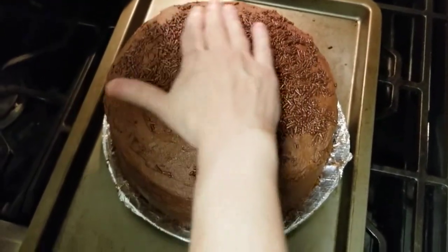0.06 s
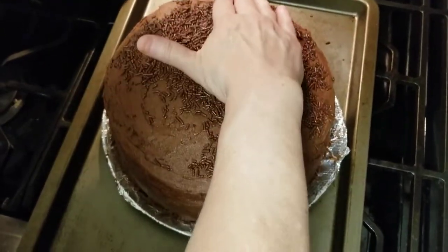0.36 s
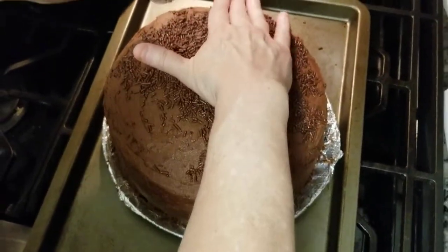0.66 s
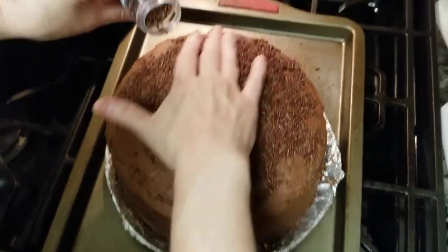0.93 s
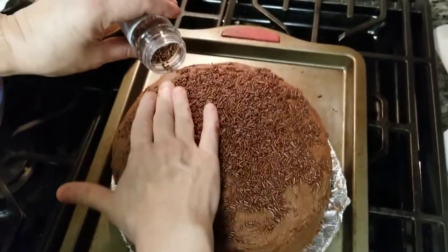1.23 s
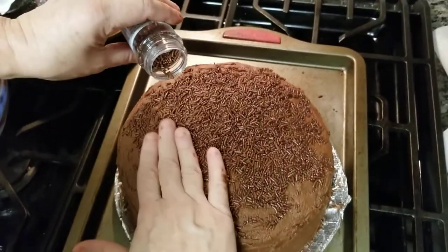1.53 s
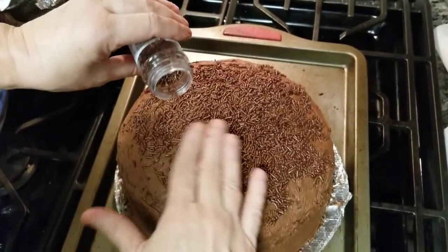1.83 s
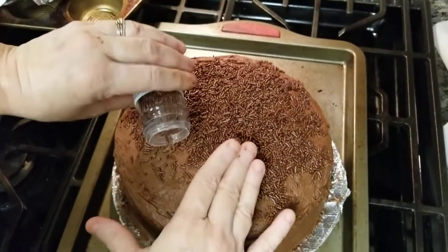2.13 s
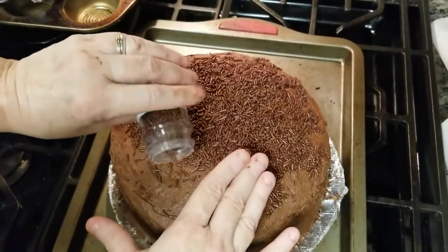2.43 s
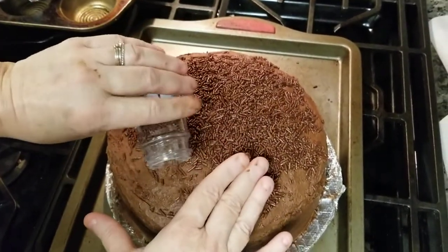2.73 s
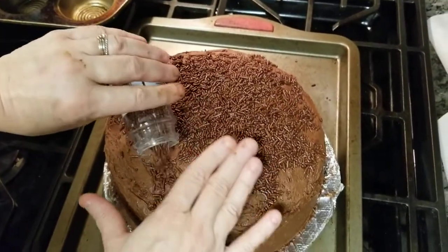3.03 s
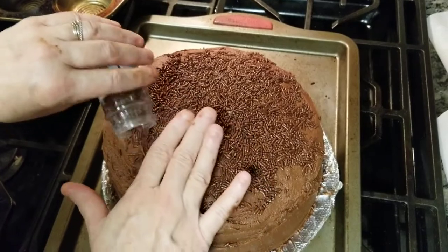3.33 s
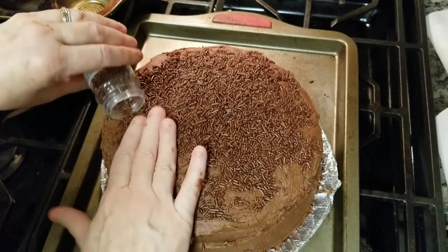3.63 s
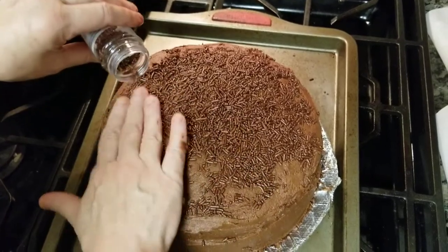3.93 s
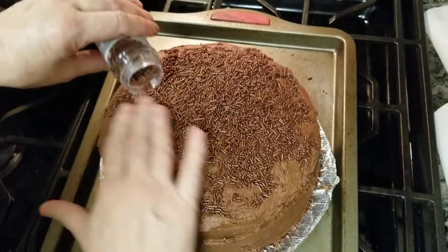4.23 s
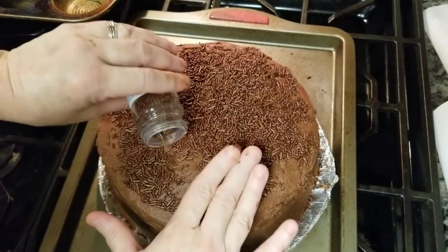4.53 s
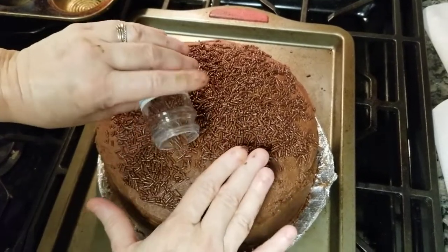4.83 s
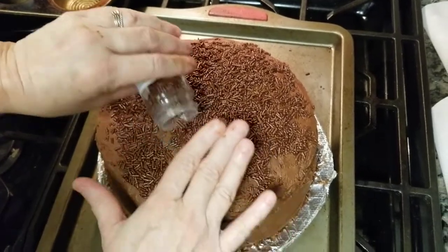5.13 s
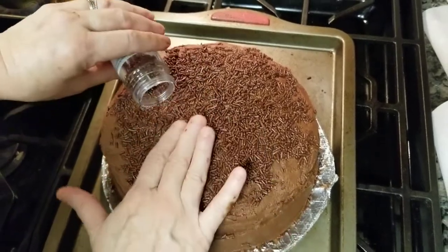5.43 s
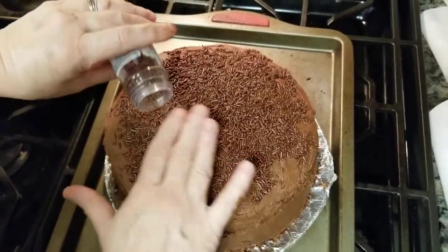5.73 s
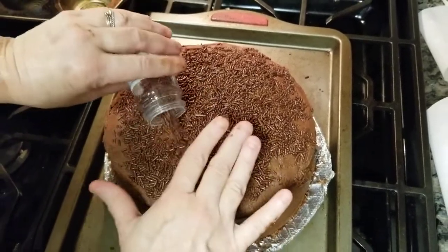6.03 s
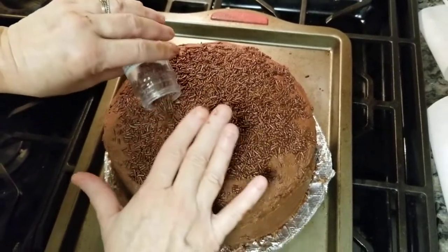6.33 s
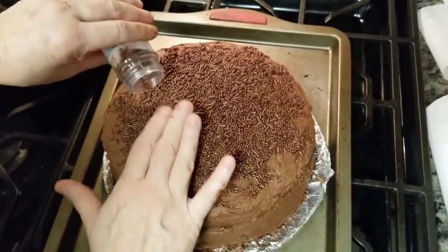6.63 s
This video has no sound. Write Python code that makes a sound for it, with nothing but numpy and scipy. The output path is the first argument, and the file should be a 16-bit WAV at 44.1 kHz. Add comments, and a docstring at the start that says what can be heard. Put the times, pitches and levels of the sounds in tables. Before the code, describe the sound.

Sprinkles are shaken from a small plastic jar onto a cake, heard close up in a small kitchen with a faint, low appliance hum throughout. A sharp tick comes at about 0.4 seconds, followed by light clicks and three gentle shakes around 1 second, while a hand faintly rubs the grains. After a lull, four short, bright rattles come between 2.1 and 3 seconds. Grains then trickle out in a fine, high patter, with clumps ticking irregularly on the jar and baking tray until about 4 seconds. Three more shakes follow from 4.5 to 4.9 seconds. The hand pats the soft cake with dull thuds, clearest near 5.3 and 5.6 seconds. The strongest shake comes at 5.8 seconds with a brief, thin scrape. Four more follow about a quarter second apart, with trickling grains and two soft pats near 6.5 and 6.7 seconds.

```python
"""In a small kitchen where an appliance hums, a frosted cake stands on a baking tray on a stove.
Chocolate sprinkles are shaken onto it from a small plastic jar, while a hand spreads and pats them.
Each shake throws the grains along the jar, and their many collisions merge into a bright swell.
They trickle out, and clumps tick on jar and tray, exciting the resonances of both.
Grains rolling under the palm sound its hollow; a pat on the soft cake gives a dull thud."""
import sys
import numpy as np
from scipy import signal
from scipy.fft import rfft, irfft
from scipy.io import wavfile
from scipy.ndimage import uniform_filter1d

SR = 44100
rng = np.random.default_rng(int(sys.argv[2]) if len(sys.argv) > 2 else 0)


def file_out(sig):
    """Save sig as 16-bit WAV at sys.argv[1]."""
    # one column per channel
    cols = np.atleast_2d(sig).T
    # limit, then scale
    lim = np.clip(cols, -1, 1)
    pcm = np.round(lim * 32767).astype(np.int16)
    wavfile.write(sys.argv[1], SR, pcm)


N = 298723
TIME = np.arange(N) / SR

# All table levels are relative; each source adds its own gain.
# motor tones of the appliance: (frequency [Hz], level [dB], waver [0-1])
MOTOR_TONES = [(117.8, -60.5, 0.22), (187.7, -63, 0.37), (211.8, -64, 0.77), (234.3, -56.5, 0.43),
               (372.3, -73, 0.7), (396, -74.5, 0.49), (1181, -78, 0.2)]
# the appliance swells and sinks, and its deepest tone fades: (time [s], level [dB])
APPLIANCE_SWELL = [(0, -3.5), (.6, 2), (1.4, 2), (3.2, -0.5), (5.3, 0), (6.77, -0.5)]
DRONE_FADE = [(0, -53.5), (1.15, -50.5), (3.9, -60), (5.3, -71), (6.77, -66)]
# spectrum of the kitchen air: (frequency [Hz], level [dB])
AIR_SPECTRUM = [(20, -38), (45, -6), (95, 0.5), (165, -2.5), (225, 4), (290, -5.5), (420, -10), (650, -10),
                (1000, -21.5), (2000, -29), (3500, -64), (8000, -46), (15500, -43)]
# transfer from the cake to each ear: (frequency [Hz], gain [dB])
LEFT_RESPONSE = [(600, -5), (1100, -3.5), (1500, -1.5), (2000, -3), (2550, -2.5), (3200, 0.5), (4500, 3.5),
                 (7000, 4.5), (8300, 0.5), (10500, 0.5), (15500, -0.5)]
RIGHT_RESPONSE = [(600, -3.5), (1100, 2), (1500, 0.5), (2000, 4), (2550, 4), (3200, 0), (4500, 3.5),
                  (7000, 0.5), (8300, 1), (10500, 2.5), (15500, -5.5)]
# soft pats on the cake: (time [s], level [dB], frequency [Hz])
CAKE_PATS = [(3.62, -42.5, 85), (4.463, -46, 80), (5.348, -35, 120), (5.563, -32, 102), (6.495, -41, 111),
             (6.716, -32.5, 104)]
# strokes of the hand over the sprinkles: (start [s], length [s], level [dB])
HAND_STROKES = [(0.0, 0.11, -60), (0.4, 0.58, -60), (0.83, 0.091, -58.5), (1.17, 0.38, -60),
                (4.44, 0.41, -69), (4.9, 0.87, -56.5), (5.77, 0.98, -62.5)]
# modes of the hollow under the palm and of the jar: (frequency [Hz], T60 [s], level [dB])
PALM_RESONANCES = [(1430, 0.014, -4.5), (1916, 0.0071, 0.5), (2720, 0.0068, -8.5)]
JAR_RESONANCES = [(2140, 0.027, -11.5), (2450, 0.009, -3.5), (3480, 0.047, -10.5)]
# spectra of grains rubbing, falling and rattling, of jar wall and tray: (frequency [Hz], level [dB])
RUBBING_SPECTRUM = [(300, -21), (700, -8.5), (1100, -7), (1650, -7), (2000, 3.5), (2400, -2), (3100, -3),
                    (4500, -7.5), (8000, -3), (15000, -36)]
TRICKLE_SPECTRUM = [(500, -6), (1500, -32.5), (3000, -26.5), (5000, -9.5), (6200, -15.5), (7300, -6.5),
                    (9300, -10), (11500, 2), (12800, 4), (14000, 8), (15500, 0)]
RATTLE_SPECTRUM = [(300, -21.5), (1000, -25), (2200, -25.5), (3200, -15.5), (5000, -14), (6200, -13.5),
                   (7300, -4.5), (9000, -7), (11500, 3.5), (13000, 4.5), (14000, 5.5), (15500, 3)]
WALL_SPECTRUM = [(400, -16), (1000, -7), (1550, -3), (2050, 7.5), (2500, 4), (3000, 0.5), (3600, -1),
                 (5400, -4), (8000, 1), (15000, -6.5)]
TRAY_SPECTRUM = [(150, -14), (380, -9), (500, 5), (650, -1.5), (850, 0.5), (1200, -5), (1800, -3),
                 (4000, -26.5)]
# grains scraping along the jar: (time [s], level [dB])
SCRAPE_LEVELS = [(5.68, -82), (5.77, -61), (5.84, -48), (5.95, -51), (6.03, -60), (6.2, -77)]
# the jar is tipped and grains run out: (start [s], length [s], trickle [dB], rubbing [dB])
JAR_POURS = [(0.0, 0.15, -44.5, -49), (0.78, 0.25, -54.5, -51), (1.15, 0.073, -44.5, -54),
             (1.25, 0.11, -40, -49.5), (1.66, 0.06, -51.5, -66), (2.3, 0.074, -49, -50.5),
             (2.42, 0.29, -46.5, -68), (2.77, 0.094, -41.5, -54), (2.94, 0.39, -37.5, -48.5),
             (3.43, 0.079, -38, -50.5), (3.8, 0.077, -44, -46.5), (4.0, 0.022, -42.5, -50),
             (4.45, 0.019, -34, -47.5), (4.6, 0.2, -45.5, -58), (4.9, 0.12, -40.5, -47.5),
             (5.06, 0.06, -40.5, -50), (5.78, 0.3, -38, -50), (6.18, 0.31, -40, -51.5)]
# the jar is jiggled and small clumps drop: (start [s], end [s], level [dB])
JAR_JIGGLES = [(0.49, 0.98, -43.5), (2.4, 2.72, -47.5), (2.96, 3.3, -38.5), (3.94, 4.06, -38),
               (4.1, 4.28, -55), (5.0, 5.3, -51), (6.55, 6.71, -47.5)]
# the loudest clumps on jar or tray: (time [s], rattle [dB], jar wall [dB], tray [dB], length [s])
CLUMP_HITS = [(0.385, -23.5, -34, -46, 0.0084), (0.424, -36, -51, -57, 0.0093),
              (0.4585, -36, -45, -72, 0.017), (0.5675, -46, -65, -78, 0.012),
              (0.678, -31.5, -47.5, -74, 0.0061), (1.506, -40.5, -55, -58, 0.024),
              (1.881, -37.5, -72, -72, 0.0044), (2.1217, -21.5, -28, -41, 0.01),
              (2.2368, -28.5, -36, -50, .01), (2.298, -38, -45, -60, 0.018),
              (2.564, -25.5, -55, -69, 0.014), (2.7743, -27.5, -37.5, -47, 0.01),
              (2.875, -32, -44.5, -69, 0.014), (2.9026, -27.5, -39.5, -44.5, 0.011),
              (3.034, -32, -36, -46.5, .012), (3.1825, -31.5, -42, -64, 0.0055),
              (3.3338, -24.5, -40.5, -42.5, 0.009), (3.3685, -44, -39, -47, 0.0065),
              (3.3974, -28, -35, -44.5, 0.011), (3.4327, -42, -37, -65, 0.0067),
              (3.4801, -27, -44, -55, 0.0084), (3.513, -37.5, -42.5, -53, 0.013),
              (3.568, -37, -43.5, -53, 0.009), (3.5897, -48, -39.5, -68, 0.0079),
              (3.6147, -32, -43, -57, 0.016), (3.6727, -34, -42, -56, 0.014),
              (3.7394, -37.5, -48.5, -55, 0.016), (3.7866, -38, -54, -61, 0.024),
              (3.8602, -28, -35.5, -72, 0.0073), (3.913, -55, -40, -72, 0.0041),
              (3.9251, -31, -45, -65, 0.019), (4.458, -26, -41.5, -52, .009), (4.608, -33, -48, -67, 0.01),
              (4.8015, -39, -43, -69, 0.0093), (4.826, -26.5, -34.5, -49.5, 0.017),
              (5.3478, -28.5, -45, -57, 0.011), (5.4215, -28, -35.5, -76, .0077),
              (5.7594, -22.5, -29, -66, 0.0017), (5.7866, -30, -36, -51, 0.0017),
              (5.829, -46, -30.5, -68, 0.0052), (6.3605, -42, -44, -53, 0.0068)]
# the load sliding along the jar:
# (crest time [s], rattle [dB], jar wall [dB], swell time [s], left minus right [dB])
JAR_SHAKES = [(0.821, -29, -37, 0.0068, -1), (1.006, -31.5, -40.5, 0.0065, 0),
              (1.17, -33.5, -42, 0.0066, 0), (2.094, -18, -46, 0.003, 1), (2.339, -19, -47, 0.0048, -0.5),
              (2.747, -21, -51, 0.0027, -1), (2.944, -19.5, -35, 0.0064, -0.5),
              (4.475, -18, -56, 0.0048, 0.5), (4.719, -20, -43, 0.0054, 0.5),
              (4.923, -19.5, -43.5, 0.0071, -1), (5.564, -29.5, -37, 0.0023, -2),
              (5.813, -14, -40, 0.0042, 0.5), (6.039, -22.5, -57, 0.0044, 1.5),
              (6.252, -18, -34.5, 0.0088, 1), (6.502, -27, -38, 0.0032, 1), (6.72, -23.5, -38, 0.0024, 2)]


def undb(db):
    """Amplitude ratio of a level in decibels."""
    return 10 ** (np.asarray(db) / 20)


def unit(x):
    """Normalisation to an RMS value of one."""
    return x / np.sqrt(np.mean(x ** 2))


def curve(rows):
    """Gain over time, interpolated between (time [s], level [dB]) points."""
    times, levels = np.transpose(rows)
    return undb(np.interp(TIME, times, levels))


def gestures(rows, attack_s, release_s, level_column=2):
    """Incoherent sources add in power: the joint envelope of gestures that rise, hold and decay."""
    power = np.zeros(N)
    for row in rows:
        t = TIME - row[0]
        shape = np.clip(t / attack_s, 0, 1) * np.exp(-np.maximum(t - row[1], 0) / release_s)
        power += (undb(row[level_column]) * shape) ** 2
    return np.sqrt(power)


def drift(rate_hz):
    """Smoothed random steps give a slow fluctuation of unit RMS."""
    hold = int(SR / rate_hz)
    steps = np.repeat(rng.standard_normal(N // hold + 1), hold)
    return unit(uniform_filter1d(uniform_filter1d(steps, hold), hold)[:N])


def butterworth(x, order, hz, kind):
    """Maximally flat low-pass or high-pass filter."""
    return signal.sosfilt(signal.butter(order, hz, kind, fs=SR, output="sos"), x)


def colour(x, spectrum, size=2048):
    """Minimum-phase filter that imposes a spectrum and keeps the power of white noise."""
    hz, db = np.transpose(spectrum)
    bin_hz = np.arange(size + 1) * SR / (2 * size)
    gain = undb(np.interp(np.log(bin_hz + 1), np.log(hz), db))
    cepstrum = irfft(np.log(gain))
    cepstrum[1:size] *= 2  # folding the cepstrum makes the filter causal
    cepstrum[size + 1:] = 0
    response = irfft(np.exp(rfft(cepstrum)))
    return signal.fftconvolve(x, response[None] / np.linalg.norm(response))[:, :N]


def ring(x, hz, t60):
    """Forced response of one damped mode, keeping the power of white noise."""
    pole = np.exp((2j * np.pi * hz - np.log(1000) / t60) / SR)
    return signal.lfilter([1], [1, -pole], x).imag * np.sqrt(2 * (1 - abs(pole) ** 2))


def impacts(per_s, spread_db, scatter_s, shared):
    """Shot noise: tray and stove scatter each random collision into a burst, partly alike at both ears."""
    hits = rng.random(N) < per_s / SR
    size = np.minimum(rng.exponential(size=N), 4)
    energy = hits * undb(spread_db * size) ** 2
    energy = signal.lfilter([1], [1, -np.exp(-2 / (scatter_s * SR))], energy)
    noise = rng.standard_normal((2, N)) + shared * rng.standard_normal(N)
    return unit(np.sqrt(energy) * noise)


def air(level_db=-54, wide_hz=800):
    """A soft rush of air, whose long waves are nearly coherent at the two ears."""
    mid, side = colour(rng.standard_normal((2, N)), AIR_SPECTRUM)
    side = 0.21 * side + 0.65 * butterworth(side, 1, wide_hz, "high")
    return undb(level_db) * np.sqrt(curve(APPLIANCE_SWELL)) * np.array([mid + side, mid - side])


def appliance_hum(drone_hz=59.2, drone_db=1.0):
    """Motor tones waver by random modulation of amplitude and phase, above a fading drone."""
    hum = undb(drone_db) * curve(DRONE_FADE) * np.sqrt(2) * np.sin(2 * np.pi * drone_hz * TIME)
    for hz, db, waver in MOTOR_TONES:
        sway = max(1 - waver, 0) + waver * (drift(14) + 1j * drift(14))
        tone = unit((sway * np.exp(2j * np.pi * hz * TIME)).real)
        hum += undb(db) * curve(APPLIANCE_SWELL) * tone
    return hum


def kitchen_reverb(x, level_db=-10, low_t60=0.2, treble_t60=0.13, split_hz=6000):
    """The diffuse field of a small room joins the direct sound and decays, the treble sooner."""
    t = TIME[:SR // 2]
    noise = rng.standard_normal((2, len(t)))
    low = butterworth(noise, 2, split_hz, "low") * 1000 ** (-t / low_t60)
    treble = butterworth(noise, 2, split_hz, "high") * 1000 ** (-t / treble_t60)
    tail = (low + treble) * (1 - np.exp(-t / 0.004))
    tail /= np.linalg.norm(tail, axis=1, keepdims=True)
    return x + undb(level_db) * signal.fftconvolve(x, tail, axes=1)[:, :N]


def early_reflections(x, echo_db=-3.5, span_s=0.004, count=14):
    """Echoes off hand, jar and tray interfere with the direct sound; they shift as the hands move."""
    out, hop = x.copy(), SR // 5
    gain = undb(echo_db) / np.sqrt(count)
    for start in range(0, N, hop):
        lo, hi = max(start - hop, 0), min(start + hop, N)
        window = np.cos(np.pi / 2 * (np.arange(lo, hi) - start) / hop)
        for ear in range(2):
            for place, sign in zip(rng.random(count), rng.choice([-1, 1], count)):
                lag = 1 + int(place * span_s * SR)
                out[ear, lo + lag:hi] += sign * gain * (window * x[ear, lo:hi])[:-lag]
    return out / np.sqrt(1 + undb(echo_db) ** 2)


def pats(rise_s=0.0037):
    """Heavy damping: the soft cake and its tray thud for only a few cycles."""
    out = np.zeros(N)
    for s, db, hz in CAKE_PATS:
        t = np.maximum(TIME - s, 0)
        envelope = t / rise_s * np.exp(1 - t / rise_s)
        out += undb(db) * envelope * np.sin(2 * np.pi * hz * t)
    return out


def palm_hollow(strokes, level_db=-3):
    """Cavity resonance: grains rolling under the palm excite the modes of its hollow."""
    rolling = impacts(per_s=1500, spread_db=1.9, scatter_s=0.0061, shared=0.21) * strokes
    hollow = sum(undb(db) * ring(rolling, hz, t60) for hz, t60, db in PALM_RESONANCES)
    return undb(level_db) * butterworth(hollow, 2, 1000, "high")


def jar_scrape(level_db=-1):
    """Sliding friction: grains drive one mode of the jar wall into a narrow note."""
    sliding = impacts(per_s=1500, spread_db=3.5, scatter_s=0.00067, shared=0.47) * curve(SCRAPE_LEVELS)
    return undb(level_db) * ring(sliding, hz=1940, t60=0.019)


def crunch(uneven, strokes, level_db=-3, settling_db=-75.5, pressing_db=-8):
    """Friction between grains: they crunch against each other in each pour and under the hand."""
    pours = gestures(JAR_POURS, attack_s=0.02, release_s=0.074, level_column=3)
    rubbing = uneven * pours + undb(settling_db)
    pressing = undb(pressing_db) * strokes
    grains = impacts(per_s=1100, spread_db=3.4, scatter_s=0.0066, shared=0.41)
    return undb(level_db) * colour(grains * np.hypot(rubbing, pressing), RUBBING_SPECTRUM)


def trickle(uneven, click_db=-8, settling_db=-66):
    """Independent impacts: loose grains patter down in each pour, and a few click sharply."""
    flow = uneven * gestures(JAR_POURS, attack_s=0.02, release_s=0.052) + undb(settling_db)
    patter = impacts(per_s=900, spread_db=2.6, scatter_s=0.003, shared=0.2)
    clicks = undb(click_db) * impacts(per_s=45, spread_db=2.5, scatter_s=0.0007, shared=0.6)
    return colour((patter + clicks) * flow, TRICKLE_SPECTRUM)


def small_clumps(gap_s=0.048, jitter=0.25, scatter_db=4.5, wall_db=-12, tray_db=-29, length_s=0.014):
    """A jittered pulse train: clumps drop from the jiggled jar at uneven gaps; rows as in CLUMP_HITS."""
    slots = np.arange(0, TIME[-1], gap_s)
    deviations = rng.standard_normal((N // 1000, 2))
    rows = []
    for slot, (late, size) in zip(slots, deviations):
        s = slot + jitter * gap_s * late
        for start, end, db in JAR_JIGGLES:
            if start <= s < end:
                level = db + scatter_db * size
                rows.append((s, level, level + wall_db, level + tray_db, length_s))
    return rows


def ticks(rattle_db=0.6, ring_db=-12, tray_db=-3, hold=0.33, detune=0.11):
    """Impact excitation: a clump lands at once and chatters briefly; the jar rings, the tray knocks."""
    force, rings = np.zeros((3, 2, N)), np.zeros((2, N))
    grains = impacts(per_s=10000, spread_db=3.2, scatter_s=0.00042, shared=0.2)
    clumps = CLUMP_HITS + small_clumps()
    # grip and load shift the jar's modes from one tick to the next
    grips = rng.uniform(-0.83, 1, (len(clumps), len(JAR_RESONANCES)))
    for (s, *levels, length), grip in zip(clumps, grips):
        span = slice(int(s * SR), int(s * SR) + SR // 10)
        t = TIME[span] - s
        contact = 0.5 * np.exp(-t / 0.0012)
        chatter = np.exp(-np.maximum(t - hold * length, 0) / length)
        clump = grains[:, span] * (contact + chatter)
        force[:, :, span] += undb(levels)[:, None, None] * clump
        for (hz, t60, db), shift in zip(JAR_RESONANCES, grip):
            rings[:, span] += undb(levels[1] + db) * ring(clump, hz * (1 + detune * shift), t60)
    rattle, wall, tray = force
    jar = colour(wall, WALL_SPECTRUM) + undb(ring_db) * rings
    knock = colour(tray + 1.36 * tray[::-1], TRAY_SPECTRUM)  # long waves reach both ears nearly alike
    return undb(rattle_db) * colour(rattle, RATTLE_SPECTRUM) + jar + undb(tray_db) * knock


def shakes(rattle_db=0.5, wall_db=-2.0, rise=1.21, spill_db=-18, spill_s=0.061, lead=4.0):
    """Dense collisions merge into noise: grains gather speed, crowd the jar's neck, and a few spill."""
    rattle_gain, wall_gain = np.zeros((2, N)), np.zeros(N)
    for s, db, body_db, swell_s, side_db in JAR_SHAKES:
        t = TIME - s
        reach = t / (swell_s * np.where(t < 0, rise, 1))
        crest = np.exp(1 - np.sqrt(1 + reach ** 2))
        released = np.clip(t / swell_s + lead, 0, 1)  # the load breaks loose shortly before the crest
        spill = (t > 0) * undb(spill_db) * np.exp(-np.abs(t) / spill_s)
        shape = np.maximum(crest * released, spill)
        pan = undb([[side_db / 2], [-side_db / 2]])
        rattle_gain += undb(db) * pan * shape
        wall_gain += undb(body_db) * shape
    grains = impacts(per_s=8300, spread_db=1.0, scatter_s=0.001, shared=0.38)
    rattle = undb(rattle_db) * colour(grains * rattle_gain, RATTLE_SPECTRUM)
    wall = undb(wall_db) * colour(grains * wall_gain, WALL_SPECTRUM)
    return rattle + wall


def scene():
    """Superposition at the two ears: jar and hand close by, the kitchen around them."""
    jar = shakes() + ticks()
    uneven = undb(1.5 * drift(rate_hz=25))  # the flow of grains fluctuates
    strokes = gestures(HAND_STROKES, attack_s=0.058, release_s=0.14)
    sprinkles = jar + trickle(uneven) + crunch(uneven, strokes) + palm_hollow(strokes) + jar_scrape()
    left, right = early_reflections(sprinkles)
    at_ears = np.vstack([colour(left[None], LEFT_RESPONSE), colour(right[None], RIGHT_RESPONSE)])
    return kitchen_reverb(at_ears) + pats() + appliance_hum() + air()


def record(dry):
    """Band limiting: a steep low-pass filter removes the treble above about 16 kHz."""
    return signal.sosfilt(signal.ellip(10, 0.2, 70, 16050, fs=SR, output="sos"), dry)


dry = scene()
out = record(dry)
file_out(out)
```